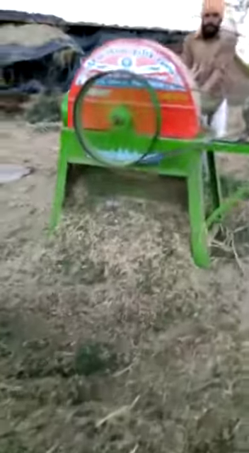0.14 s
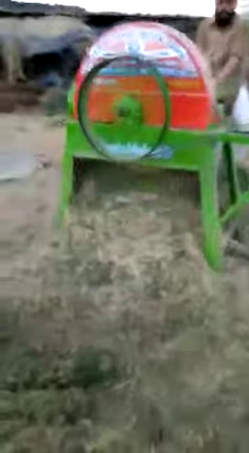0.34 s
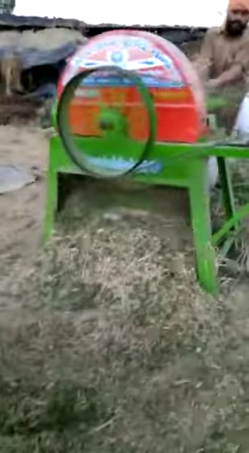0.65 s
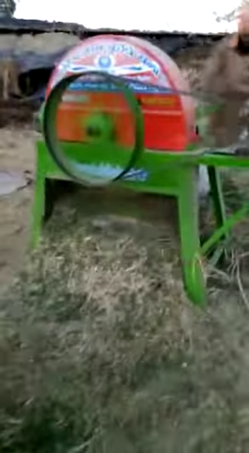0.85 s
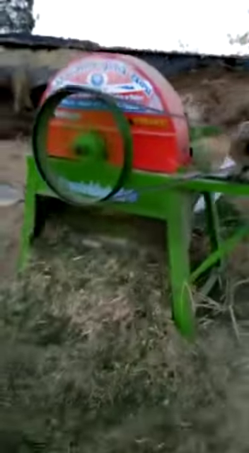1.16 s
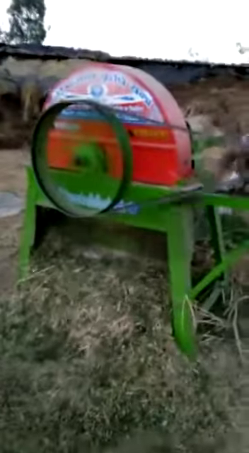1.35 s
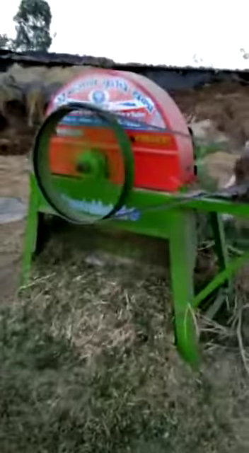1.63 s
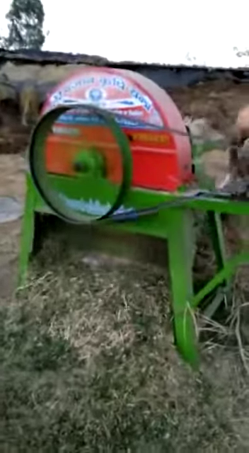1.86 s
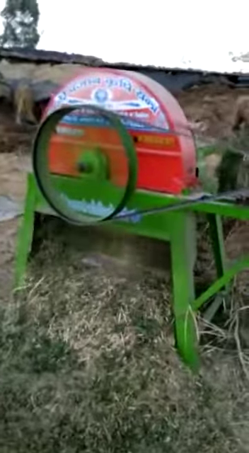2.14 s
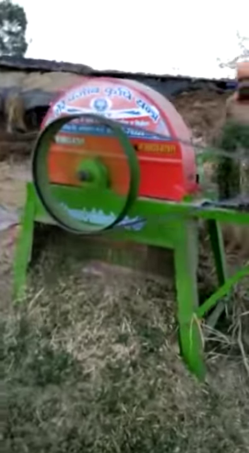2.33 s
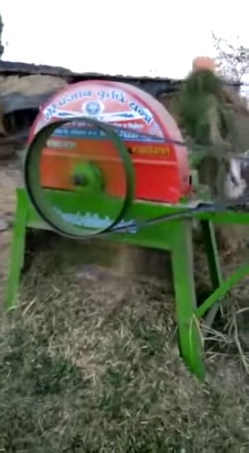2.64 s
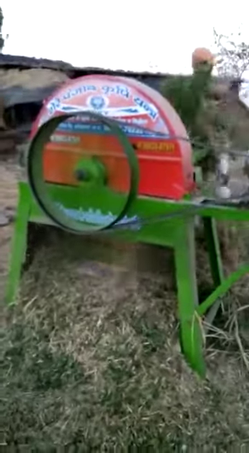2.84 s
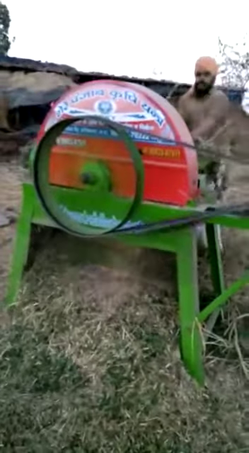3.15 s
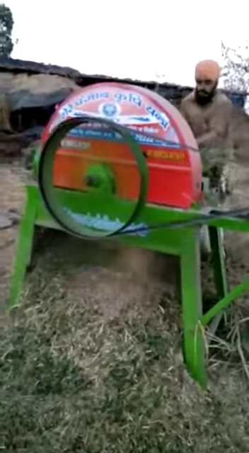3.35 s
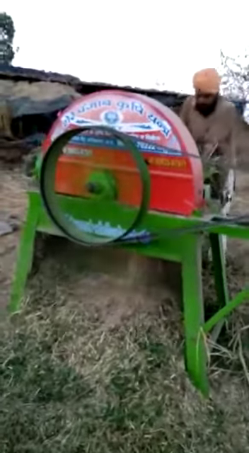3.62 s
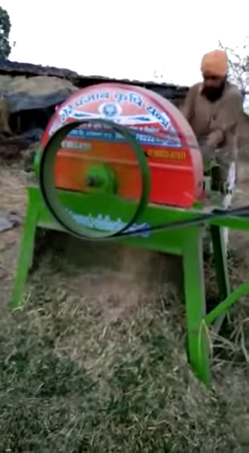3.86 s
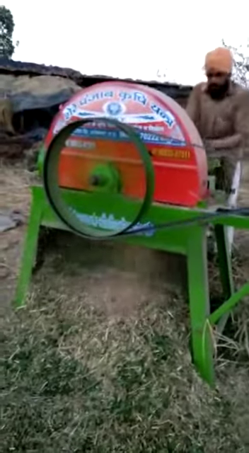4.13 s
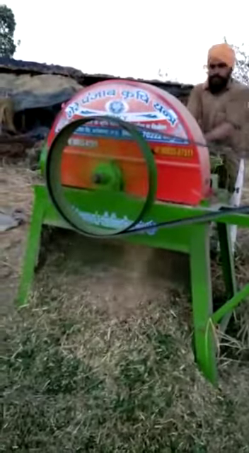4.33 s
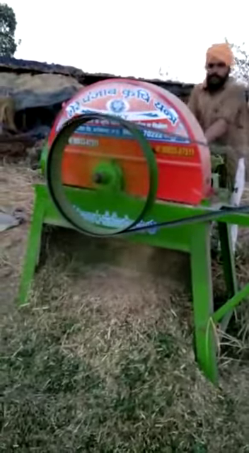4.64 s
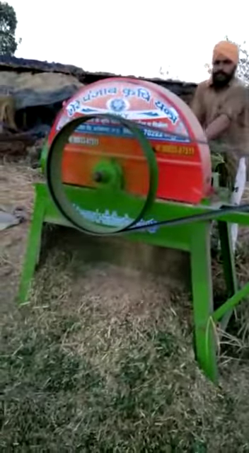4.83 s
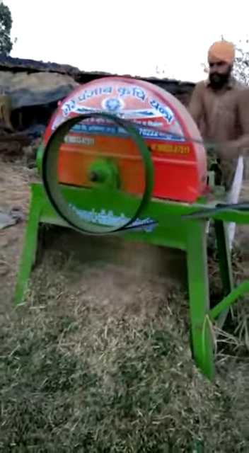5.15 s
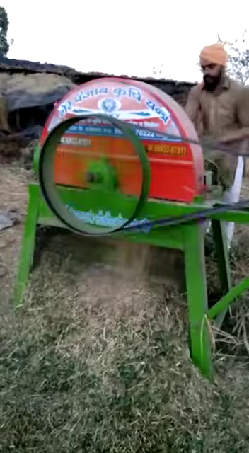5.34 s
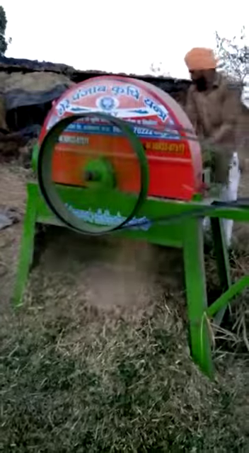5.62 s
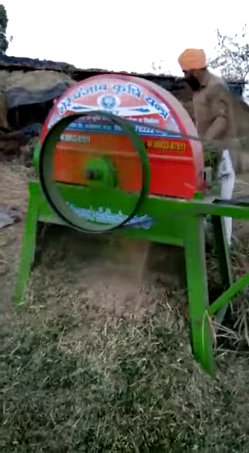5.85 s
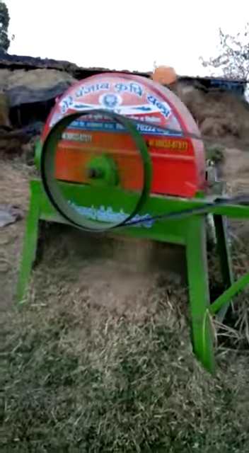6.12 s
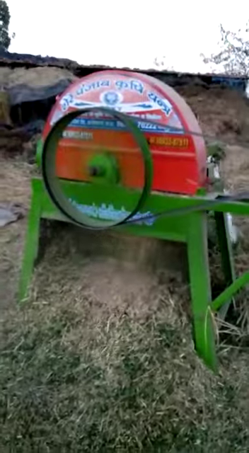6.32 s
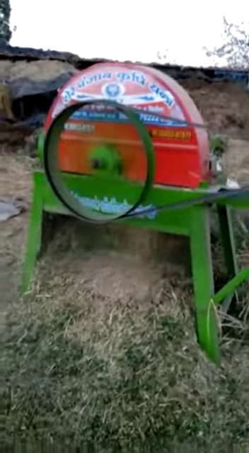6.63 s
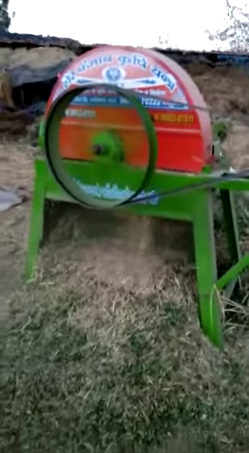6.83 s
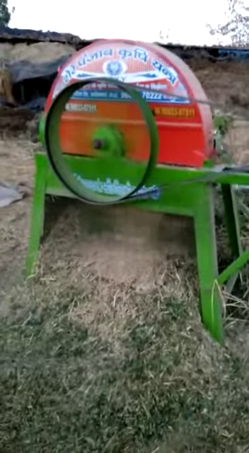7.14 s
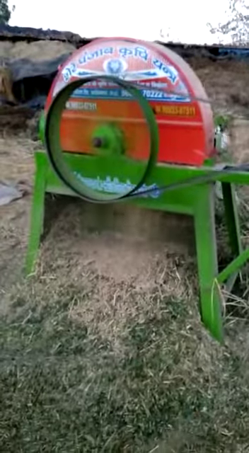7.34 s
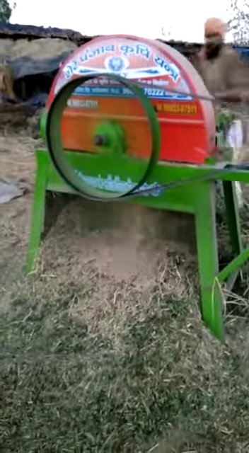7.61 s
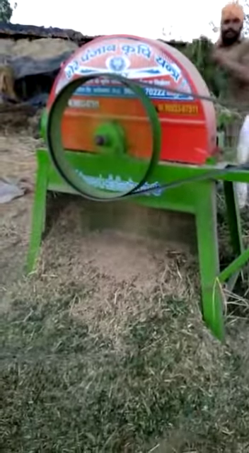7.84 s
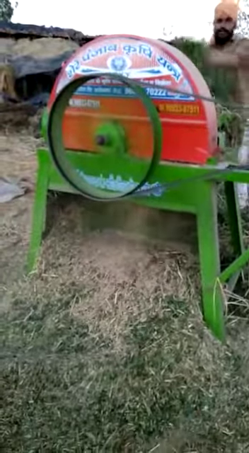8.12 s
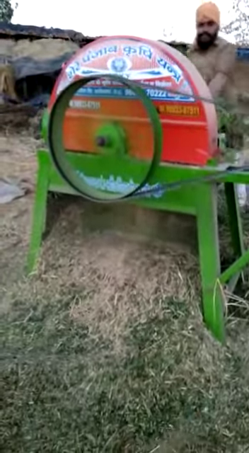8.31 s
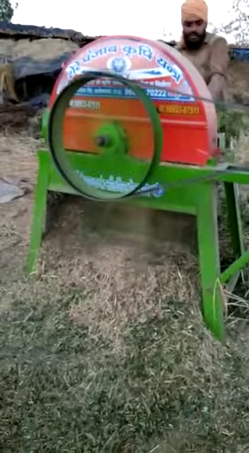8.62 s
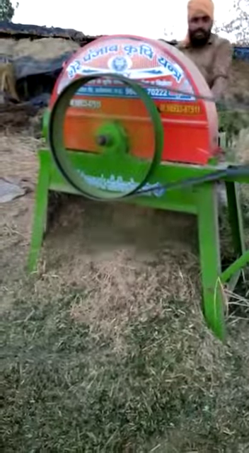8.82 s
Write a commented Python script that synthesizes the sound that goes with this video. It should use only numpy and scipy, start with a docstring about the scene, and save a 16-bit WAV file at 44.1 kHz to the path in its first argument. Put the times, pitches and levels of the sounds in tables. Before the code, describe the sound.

A belt-driven fodder chopper runs without a break for about nine seconds in an open yard, a few metres from the microphone. Its blades shear stalks about seven times a second, each pass a bright, crackling swish over a fizz of chaff. The belt's riveted joint strikes two pulleys in sharp, uneven pairs of clacks, between four and five clacks a second, the loudest sounds. Very short, high belt squeals slip in between, and stray stalks snap at irregular moments. Gears and loose steel panels rattle and buzz, strongest in the first 2.5 seconds and again around 8.5 seconds. A loose plate chinks quickly, fading from about 3 to 6 seconds and then returning. A breeze buffets the microphone in low puffs, most noticeably in the first 1.5 seconds and more lightly afterwards, over a faint, dull outdoor rumble.

```python
"""A hissing steel rattle runs throughout: gears shake a belt-driven fodder cutter in an open yard. A blade
snaps as it bites in, each blade pass shears the feed with a crackling swish, and a loose plate chinks. A breeze
buffets the small microphone. The belt's riveted joint clacks over two pulleys, and the belt squeals in short
slips."""
import sys
import numpy as np
from scipy import signal
from scipy.fft import rfft, irfft, next_fast_len
from scipy.io import wavfile
from scipy.ndimage import uniform_filter1d

SR = 44100
rng = np.random.default_rng(int(sys.argv[2]) if len(sys.argv) > 2 else 0)


def generate_wav(signal):
    """Clip the signal to [-1, 1] and save it as 16-bit WAV at the path in sys.argv[1]."""
    frames = np.transpose(np.atleast_2d(signal))
    scaled = np.clip(frames, -1, 1) * 32767
    pcm = np.round(scaled).astype(np.int16)
    wavfile.write(sys.argv[1], SR, pcm)


N = 395577


def gain_of(db):
    """Turns decibels into a number to multiply by."""
    return 10 ** (np.asarray(db) / 20)


def evened(x):
    """Scales a sound to an average strength (rms) of 1."""
    return x / np.sqrt(np.mean(x ** 2) + 1e-20)


def coloured(x, points):
    """Shapes the tone of x along (Hz, dB) points; strength 1."""
    point_hz, db = np.transpose(points)
    size = next_fast_len(N)
    hz = np.fft.rfftfreq(size, 1 / SR)
    gain = gain_of(np.interp(np.log(hz + 1), np.log(point_hz + 1), db))
    return evened(irfft(rfft(x, size) * gain, size)[:N])


def ring(x, hz, *widths):
    """Rings x at one pitch, once for each width in Hz; narrower rings longer."""
    for width in widths:
        x = signal.lfilter(*signal.iirpeak(hz, hz / width, SR), x)
    return x


def glide(x, hz, width):
    """Rings x at a moving pitch; strength 1."""
    turn = np.exp(2j * np.pi * np.cumsum(hz) / SR)
    fade = [1, -np.exp(-np.pi * width / SR)]
    return evened((turn * signal.lfilter([1], np.convolve(fade, fade), x / turn)).real)


def drift(per_s):
    """A random curve, about 1 in size, that turns per_s times a second."""
    steps = np.clip(rng.standard_normal(int(N / SR * per_s) + 2), -1.7, 1.7)
    return np.interp(np.arange(N) / SR * per_s, np.arange(len(steps)), steps)


def crackle(per_s, spread_db):
    """Scattered clicks, a few of them larger; strength 1."""
    size = gain_of(spread_db * np.minimum(rng.exponential(1, N), 3))
    return evened(size * rng.choice([-1., 1.], N) * (rng.random(N) < per_s / SR))


def patchy(x, depth_db, frames, bins):
    """Random patches in time and pitch give the noise a watery, warbling texture."""
    hz, _, spectrum = signal.stft(x, SR, nperseg=256, noverlap=192)
    depth_db = depth_db / (1 + (hz[:, None] / 10000) ** 4)  # the top octave stays smooth
    blobs = uniform_filter1d(rng.standard_normal(spectrum.shape), frames, 1)
    blobs = evened(uniform_filter1d(blobs, bins, 0))
    return evened(signal.istft(spectrum * gain_of(depth_db * blobs), nperseg=256, noverlap=192)[1][:N])


def add(mix, s, sound):
    """Mixes a sound in at s seconds."""
    at = round(s * SR)
    part = mix[max(at, 0):][:len(sound) + min(at, 0)]
    part += sound[max(-at, 0):][:len(part)]


def bouts(rows, rest_db, rest_hz=0, edge_s=0.038):
    """A level that swells from rest for each row, and the pitch held meanwhile."""
    level, hz = np.full(N, gain_of(rest_db)), np.full(N, float(rest_hz))
    for s, length, db, *pitch in rows:
        size = round((length + edge_s) * SR)
        swell = signal.windows.tukey(size, min(2 * edge_s * SR / size, 1))
        add(level, s - edge_s / 2, gain_of(db) * swell)
        add(hz, s - edge_s / 2, np.full(size, pitch[0] - rest_hz if pitch else 0.))
    return level, hz


# The two-bladed flywheel. Each value: time in seconds of every sixth blade pass.
FLYWHEEL_S = [.047, .86, 1.672, 2.487, 3.314, 4.142, 4.968, 5.795, 6.613, 7.433, 8.251, 9.067]


def pass_time(number):
    """When a given blade pass comes, in seconds."""
    return np.interp(number, 6 * np.arange(len(FLYWHEEL_S)), FLYWHEEL_S)


def passes_done():
    """The running count of blade passes."""
    return np.interp(np.arange(N) / SR, FLYWHEEL_S, 6 * np.arange(len(FLYWHEEL_S)), left=0)


# The tone of the hiss. Each row: pitch in Hz, level in dB.
HISS_TONE = [(1760, -51), (3000, -28), (3520, -54), (3830, -23), (3970, -34), (4230, -6.5), (5750, -5),
             (6950, 6), (8950, -3.5), (11500, -46), (12800, -8), (14800, -3), (16000, -4)]


def chaff_hiss():
    """Chaff and small parts fizz all the time, heard between the cuts."""
    hiss = coloured(0.2 * crackle(1500, 6.6) + rng.standard_normal(N), HISS_TONE)
    return patchy(hiss, 8.9, frames=19, bins=3) * gain_of(-35 + 8.2 * drift(40))


# The tone of the yard. Each row: pitch in Hz, level in dB.
YARD_TONE = [(200, 14), (600, 5), (1200, 16), (2500, -60), (3400, -42), (5000, -4)]


def yard_rumble():
    """The yard's dull, uneven background noise."""
    return gain_of(-57) * patchy(coloured(rng.standard_normal(N), YARD_TONE), 4.3, frames=38, bins=1)


# How hard the frame shakes. Each row: time in seconds, then gear, upper ring and side panel levels in dB.
FRAME_SHAKE = [(0.0, -41, -41, -36), (0.27, -32, -33, -34.5), (1.37, -39.5, -26.5, -34),
               (1.42, -30.5, -28, -32), (2.12, -35.5, -30, -42), (2.27, -51, -34, -42),
               (2.37, -32.5, -32.5, -43.5), (3.32, -47.5, -42.5, -38.5), (3.49, -35.5, -40, -42),
               (3.65, -52, -48, -54), (3.72, -35, -40, -40), (3.8, -42, -45, -49), (3.9, -35.5, -51, -40),
               (4.45, -50, -49, -51.5), (4.5, -38.5, -45, -62), (4.57, -45, -45, -40.5),
               (5.02, -45, -47, -45.5), (5.15, -38, -33, -46), (5.27, -43, -48, -41.5),
               (5.45, -39.5, -38, -51), (5.82, -36.5, -48, -43), (5.87, -55, -44, -62),
               (5.97, -35.5, -41.5, -38.5), (6.87, -43.5, -40.5, -47.5), (7.62, -44.5, -42.5, -43),
               (8.47, -37, -39, -39.5), (8.57, -44.5, -33.5, -51), (8.69, -30, -36, -31.5),
               (8.92, -47.5, -41, -51), (8.97, -54, -41, -47)]
# Loose hood and legs buzz. Each row: start and length in seconds, level in dB, pitch in Hz.
HOOD_BUZZES = [(0.165, 0.11, -39, 920), (0.304, 0.023, -41, 924), (0.882, 0.19, -36, 909),
               (1.244, 0.13, -38.5, 1032), (1.465, 0.088, -42, 980), (1.576, 0.3, -35, 938),
               (1.96, 0.12, -35.5, 924), (2.154, 0.075, -40, 910), (2.897, 0.048, -40, 902),
               (3.985, 0.035, -38, 975), (5.373, 0.03, -45, 906), (5.63, 0.043, -38.5, 895),
               (6.123, 0.055, -43.5, 940), (7.384, 0.17, -40.5, 904), (7.99, 0.09, -41.5, 904),
               (8.208, 0.064, -40.5, 925), (8.323, 0.15, -39.5, 930), (8.674, 0.036, -40.5, 907),
               (8.928, 0.033, -38, 900)]
LEG_BUZZES = [(0.031, 0.056, -37.5, 490), (0.32, 0.19, -37.5, 507), (0.592, 0.43, -40.5, 500),
              (1.246, 0.12, -42, 444), (1.4, 0.11, -35.5, 460), (1.677, 0.083, -39.5, 490),
              (2.08, 0.062, -47, 403), (2.567, 0.077, -42, 480), (2.805, 0.072, -45, 397),
              (3.315, 0.043, -38, 417), (4.559, 0.048, -43.5, 386), (5.798, 0.047, -42.5, 370),
              (5.898, 0.066, -50, 433), (7.698, 0.046, -36, 475), (8.033, 0.03, -45, 474),
              (8.4, 0.12, -44, 410), (8.717, 0.088, -39.5, 479), (8.921, 0.024, -44, 481)]
# The chute buzzes. Each row: start and length in seconds, level in dB.
CHUTE_BUZZES = [(0.009, 0.075, -41), (0.189, 0.065, -45), (0.278, 0.23, -40.5), (0.551, 0.032, -43),
                (1.28, 0.034, -41), (1.635, 0.032, -51), (2.76, 0.03, -47)]
# The side panel, then the chute. Each row: pitch and width in Hz.
PANEL_RINGS = [(1879, 173), (673, 110)]
# Weaker frame rings. Each row: pitch and width in Hz, dB relative to the upper ring.
WEAK_RINGS = [(1630, 82, -9.5), (2470, 120, -15), (1166, 320, -22), (374, 52, -24)]
# Each value: width in Hz of the gear, hood, upper and leg ring.
MOVING_WIDTHS_HZ = [91, 68, 97, 125]
TEETH_PER_S, GEAR_HZ, UPPER_HZ = 48.9, 1449.3, 2163


def frame_rattle():
    """Gear teeth knock and grind, ringing sheet steel whose pitches shift as it flexes."""
    times, *columns = np.transpose(FRAME_SHAKE)
    gear_db, upper_db, panel_db = [np.interp(np.arange(N) / SR, times, db) for db in columns]
    tooth_rate = TEETH_PER_S * (1 + 0.0312 * drift(4.3))
    teeth = gain_of(2.1 * np.cos(2 * np.pi * np.cumsum(tooth_rate) / SR))
    jolt = np.cos(2 * np.pi * (passes_done() - .05))  # every blade pass jolts the steel
    heave = np.cos(np.pi * (passes_done() - 1.15))  # the flywheel loads the gears once a turn
    knocks = teeth * (.5 * crackle(500, 1.0) + rng.standard_normal(N))
    moving = [(gain_of(gear_db + 2.06 * heave + 4.0 * drift(9)), GEAR_HZ + 35 * drift(7)),
              bouts(HOOD_BUZZES, rest_db=-52.5, rest_hz=926),
              (gain_of(upper_db + 0.66 * jolt + 1.65 * drift(7.2)), UPPER_HZ + 42 * drift(8)),
              bouts(LEG_BUZZES, rest_db=-53, rest_hz=450.5)]
    out = np.zeros(N)
    for (level, hz), width in zip(moving, MOVING_WIDTHS_HZ):
        out += level * gain_of(2.97 * drift(40)) * glide(knocks, hz, width)
    panel_levels = [gain_of(panel_db + 3.5 * jolt), bouts(CHUTE_BUZZES, rest_db=-65)[0]]
    for level, (hz, width) in zip(panel_levels, PANEL_RINGS):
        out += level * gain_of(4.5 * drift(25)) * evened(ring(knocks, hz, width, width))
    for hz, width, db in WEAK_RINGS:
        level = gain_of(upper_db + db + 1.9 * jolt + 5.1 * drift(14))
        out += level * evened(ring(knocks, hz, width, width))
    return out


# Snaps as a blade bites into the feed, just before its pass. Each row: start in seconds, peak in dB, pitch in
# Hz.
STALK_SNAPS = [(0.027, -28, 7720), (0.2294, -20, 6100), (0.55, -12, 6300), (0.664, -13, 8000),
               (0.8262, -22.5, 7940), (1.0899, -15, 7900), (1.4945, -19, 7100), (1.9865, -11, 6960),
               (2.1856, -27, 7030), (2.7307, -13, 7500), (2.837, -12.5, 6960), (3.548, -13, 7000),
               (3.6671, -24, 7180), (3.8349, -24, 7120), (4.2637, -12.5, 7030), (4.339, -16, 6850),
               (4.388, -20, 7000), (4.4882, -20, 6940), (4.81, -26, 7070), (5.229, -9, 6340),
               (5.4266, -17, 7300), (5.906, -16, 7260), (6.0334, -32, 7000), (6.1787, -23, 5950),
               (6.319, -8.5, 7060), (6.862, -10, 7040), (6.9975, -17, 6450), (7.2197, -22, 6800),
               (7.543, -12, 6500), (7.6806, -17, 7080), (7.7812, -22, 7110), (8.0526, -30, 7070),
               (8.087, -14, 6470), (8.229, -15, 7170), (8.5989, -15, 7100)]


def stalk_snaps():
    """A stalk breaks with a sharp burst of noise that rings briefly."""
    out, t = np.zeros(N), np.arange(1300) / SR
    for s, db, hz in STALK_SNAPS:
        burst = rng.standard_normal(len(t)) * np.exp(-t / 0.012) * (1 - np.exp(-t / 0.00037))
        splash = ring(ring(burst, 7100, 3400, 3400), 6900, 4500)
        snap = ring(burst, hz, 900, 900) + .5 * splash
        add(out, s, gain_of(db) * snap / abs(snap).max())
    return out


# The tone of the swish. Each row: pitch in Hz, level in dB.
SWISH_TONE = [(2600, -27.5), (3400, -43), (3800, -7.5), (5500, -2), (7240, 0), (8200, -0.5), (9500, -7.5),
              (10700, -11.5), (12500, -10.5), (15300, -2)]
# The two blades. Each row: level of the swish's body in dB, treble lift in dB.
BLADE_LEVELS = [(-22, -.5), (-20, 1)]
# The swish's treble. Each row: time in seconds, level in dB.
SWISH_TREBLE = [(0, -24), (.5, -24.5), (1.3, -26), (2.3, -23.5), (3.5, -26.5), (4.9, -27.5), (6.75, -28),
                (8, -31), (8.97, -27.5)]
# Thick stalks crunch. Each value: level in dB for one blade pass.
PASS_CRUNCH_DB = [-49, -33, -39, -31, -30, -28, -32, -27, -33, -28.5, -30, -28, -39, -33.5, -30.5, -35.5,
                  -40, -42, -40, -36, -37, -32.5, -47, -36, -42, -34, -48, -36, -49, -35, -40, -39.5, -45,
                  -39, -40, -32, -38, -31, -38, -36.5, -40, -38, -46, -39, -42, -34, -32, -35, -41, -47,
                  -37, -40, -41, -36, -31, -33, -49, -32, -33, -34.5, -36, -26.5, -37, -36, -44, -34]
CRUNCH_HZ, CRUNCH_SPREAD_HZ, STALKS_PER_PASS = 2754, 247, 5


def blade_cuts():
    """Stalks crack and hiss as a blade sweeps the mouth; thrown chaff trails after."""
    t = np.arange(-.05, .12, 1 / SR)
    rise = 1 / (1 + np.exp(-(t + 0.02) / 0.0047))
    sweep = rise / (1 + np.exp((t - .018) / 0.0049))
    trail = gain_of(-4) * rise * (1 - sweep) * gain_of(-170 * t)
    shape = sweep + trail
    body, treble, crunch = np.zeros((3, N))
    for k, crunch_db in enumerate(PASS_CRUNCH_DB):
        harder, brighter = rng.standard_normal(2)
        s, (db, lift_db) = pass_time(k), BLADE_LEVELS[k % 2]
        treble_db = np.interp(s, *np.transpose(SWISH_TREBLE))
        add(body, s + t[0], gain_of(db + 1.2 * harder) * shape)
        add(treble, s + t[0], gain_of(treble_db + lift_db + 1.5 * brighter) * shape ** 0.82)
        add(crunch, s + t[0] + 0.0083, gain_of(crunch_db) * shape ** 1.4)
    shear = coloured(0.46 * crackle(3000, 1.1) + 0.85 * rng.standard_normal(N), SWISH_TONE)
    shear = patchy(shear, 2.9, frames=9, bins=2) * gain_of(1.7 * drift(150))
    low = signal.sosfiltfilt(signal.butter(4, 9000, fs=SR, output="sos"), shear)
    # thick stalks crack lower and ring the cutter plate, each at a new pitch
    stalk_number = (STALKS_PER_PASS * passes_done()).astype(int)
    pitch = CRUNCH_HZ + CRUNCH_SPREAD_HZ * rng.standard_normal(N)[stalk_number]
    cracks = crackle(900, 4.3) + .5 * rng.standard_normal(N)
    crunch *= evened(glide(cracks, pitch, 170) + 0.86 * glide(cracks, np.full(N, 2800.), 1300))
    return body * evened(low) + treble * evened(shear - low) + crunch


# The plate chinks four times a blade pass. Each row: time in seconds, usual peak in dB.
CHINK_LEVELS = [(0, -19.5), (1, -20), (1.6, -19.5), (2.6, -22.5), (3.3, -29), (4.5, -36), (5.7, -33),
                (6.6, -26.5), (7.5, -28), (8.97, -23.5)]
# The loudest chinks. Each row: start in seconds, peak in dB, pitch in Hz.
LOUD_CHINKS = [(0.3916, -16, 3800), (.42, -16, 3780), (0.827, -19, 4080), (1.414, -13.5, 3920),
               (1.5692, -16, 3800), (3.1777, -19, 4300), (3.5955, -12, 3950), (4.1076, -21, 3860),
               (5.2087, -19, 3880), (5.7932, -18.5, 3940), (6.5819, -19.5, 3840), (6.668, -17.5, 4120),
               (7.68, -17, 3860), (8.2953, -20.5, 4010), (8.4996, -20, 3840), (8.597, -20, 4310)]
CHINK_HZ, CHINK_SPREAD_HZ, CHINK_SPREAD_DB = 4043, 150, 2
JOINT_CHINK_DB, JOINT_CHINK_HZ = -26.5, 4270  # set off by the belt joint on the far pulley


def loose_plate():
    """Thin, shaken steel gives soft-edged pings over faint chatter."""
    tooth_rate = TEETH_PER_S * (1 + 0.056 * drift(7.4))
    ticks = np.cos(2 * np.pi * np.cumsum(tooth_rate) / SR)  # one tick a gear tooth
    chatter = crackle(1200, 2) * gain_of(7 * ticks + 3 * drift(30))
    out = gain_of(-41) * glide(chatter, 4000 + 130 * drift(30), width=124)
    t = np.arange(1800) / SR
    beats = pass_time(np.arange(0, 66, .25))
    louder, higher = rng.standard_normal((len(beats), 2)).T
    peak_db = np.interp(beats, *np.transpose(CHINK_LEVELS)) + CHINK_SPREAD_DB * louder
    regular = list(zip(beats - .003, peak_db, CHINK_HZ + CHINK_SPREAD_HZ * higher))
    from_joint = [(s, JOINT_CHINK_DB, JOINT_CHINK_HZ) for s, _ in JOINT_CLACKS[::2]]
    for s, db, hz in regular + from_joint + LOUD_CHINKS:
        burst = rng.standard_normal(len(t)) * np.exp(-t / 0.01) * (1 - np.exp(-t / 0.0016))
        ping = ring(burst, hz, 450, 640, 720)
        add(out, s, gain_of(db) * ping / abs(ping).max())
    return out


# Puffs of breeze. Each row: start and length in seconds, level in dB.
PUFFS = [(.06, 0.132, -25.5), (.21, 0.081, -22.5), (.33, 0.18, -27), (.52, 0.073, -38), (.66, 0.19, -31),
         (.9, 0.052, -30), (1.02, 0.072, -29.5), (1.14, 0.093, -25.5), (1.29, .08, -32), (1.48, .05, -47),
         (1.62, 0.093, -39), (1.83, 0.043, -38), (1.95, 0.047, -45), (2.21, 0.052, -40),
         (2.39, 0.074, -41.5), (2.65, 0.065, -45), (2.78, 0.058, -34.5), (2.89, 0.064, -35.5),
         (3.34, 0.077, -37), (3.66, 0.056, -37), (3.89, .04, -44), (4.05, 0.052, -43), (4.31, .03, -47),
         (4.44, 0.15, -50), (4.7, .05, -48), (5, 0.13, -35), (5.27, .06, -38), (5.41, 0.032, -50),
         (5.55, 0.18, -49), (5.82, 0.07, -45), (6.09, 0.029, -42), (6.21, .04, -55), (6.37, .11, -46),
         (6.7, .05, -48), (6.8, 0.046, -47), (7.18, 0.059, -45), (7.6, .08, -33.5), (7.73, .04, -33),
         (7.8, 0.045, -34), (8.06, 0.026, -47), (8.43, .1, -43.5), (8.87, .12, -37)]
# The tone of the breeze. Each row: pitch in Hz, level in dB.
BREEZE_TONE = [(15, -58), (25, -27), (70, -11), (100, 0.5), (130, 0.5), (157, -4.5), (190, -1.5),
               (217, -4.5), (296, -23.5), (330, -43), (430, -56), (730, -120)]


def breeze():
    """Air buffets the microphone in low, booming lumps."""
    noise = rng.standard_normal(N)
    lumps = coloured(noise, BREEZE_TONE) + 0.81 * glide(noise, 160 + 12 * drift(12), width=31.4)
    level, _ = bouts(PUFFS, rest_db=-53.5, edge_s=0.057)
    return evened(lumps * gain_of(2.8 * drift(24))) * level


# The joint hits the far and near pulley in turn. Each row: time in seconds, peak in dB.
JOINT_CLACKS = [(0.0937, -3), (0.2718, -3), (0.5182, -3), (0.7023, -4), (0.9472, -5), (1.1328, -5),
                (1.3793, -5), (1.5653, -3), (1.8124, -5), (1.9984, -6), (2.2473, -3), (2.4349, -7),
                (2.6863, -4), (2.8719, -5), (3.1233, -4), (3.3094, -7), (3.5624, -4), (3.7474, -8),
                (4.0024, -4), (4.1904, -5), (4.4424, -3), (4.6314, -5), (4.8828, -4), (5.0684, -9),
                (5.3218, -4), (5.5074, -6), (5.7603, -5), (5.9464, -7), (6.1958, -5), (6.3824, -5),
                (6.6338, -3), (6.8209, -4), (7.0728, -3), (7.2574, -10), (7.5153, -4), (7.6969, -4),
                (7.9473, -4), (8.1339, -4), (8.3828, -5), (8.5709, -7), (8.8204, -3)]
# Rivet blows, far pulley then near. Each row: delay in seconds, level in dB, share (0-1) for the rim.
RIVET_BLOWS = [
    [(0, 2.5, 0.4), (.0011, -4, 0.4), (.0021, 2, 0.4), (.0034, -11, 0.5), (.005, 0.5, 0), (.0068, 1.5, 0),
     (.0082, 1, 0.1), (.012, -3, 0.1)],
    [(0, 0, 0.6), (.0008, -4.5, .7), (.0016, 2, .4), (.0026, 1.5, .4), (.0045, 5.5, .7), (.0075, -6, 0.7),
     (.012, -16, .5)],
]
# How the far and near pulley ring, rim first. Each row: pitch and width in Hz, level in dB.
PULLEY_RINGS = [
    [(7380, 180, 12), (4500, 850, 4.5), (6250, 1370, -0.5), (7170, 1320, 1), (3130, 2500, -17)],
    [(7160, 470, 11), (4340, 900, -5.5), (5820, 1050, -5.5), (8540, 670, 3), (9270, 1500, -5),
     (12900, 7000, -18)],
]


def belt_joint():
    """Rivets strike in a quick row, ringing the pulley's body and setting its rim singing."""
    out = np.zeros(N)
    for k, (s, db) in enumerate(JOINT_CLACKS):
        (rim_hz, rim_width, rim_db), *body = PULLEY_RINGS[k % 2]
        body_blows, rim_blows = np.zeros((2, 1200))
        for delay, rivet_db, share in RIVET_BLOWS[k % 2]:
            late, harder = rng.standard_normal(2)
            blow = gain_of([rivet_db + 1.6 * harder])
            add(body_blows, abs(delay + 0.00025 * late), (1 - 0.25 * share) * blow)
            rim_cycles = round(rim_hz * abs(delay + 0.0002 * late))  # in step with the ring
            add(rim_blows, rim_cycles / rim_hz, share * blow)
        clack = gain_of(rim_db) * ring(rim_blows, rim_hz, rim_width, 2 * rim_width)
        for j, (hz, width, ring_db) in enumerate(body):
            clack += (-1) ** j * gain_of(ring_db) * ring(body_blows, hz, width, 2 * width)
        add(out, s - .0008, gain_of(db) * clack / abs(clack).max())
    return out


# Two small slips a belt lap. Each row: pulley (0 far, 1 near), seconds before its clack,
# length in seconds, level in dB.
SMALL_SLIPS = [(0, 0.157, 0.023, -30), (1.004, .03, 0.022, -30)]
# A slip just before the far clack, from the third lap on. Each value: one lap's level in dB.
MAIN_SLIP_DB = [-22.5, -32, -31, -22.5, -24, -24.5, -26, -23, -22, -26, -22, -26, -24.5, -29, -27, -22.5,
                -31, -22.5, -28]
# Slips out of step with the joint. Each row: start and length in seconds, level in dB.
STRAY_SLIPS = [(1.177, 0.014, -26.5), (1.495, .015, -29), (2.536, 0.054, -27), (3.341, 0.021, -38),
               (3.666, 0.029, -25), (3.784, 0.02, -27), (3.873, 0.025, -25), (4.113, .013, -26),
               (4.18, 0.06, -27), (4.75, 0.04, -26), (5.014, 0.029, -25.5), (5.426, 0.025, -25),
               (5.543, 0.023, -25), (5.98, 0.019, -31), (6.06, .014, -35), (7.198, 0.035, -30),
               (7.616, 0.016, -24), (7.725, 0.028, -22.5), (8.054, 0.017, -28), (8.487, .012, -27),
               (8.516, .014, -23), (8.603, .034, -28), (8.802, 0.0091, -21)]
SQUEAL_HZ, SMALL_FROM_S, MAIN_LEAD_S, MAIN_LENGTH_S = 7030, .8, 0.065, 0.049


def belt_squeal():
    """The belt grips and slips: wavering whistles over a faint, constant whine."""
    slips = [(s - lead, length, db) for pulley, lead, length, db in SMALL_SLIPS
             for s, _ in JOINT_CLACKS[int(pulley)::2] if s > SMALL_FROM_S]
    slips += [(s - MAIN_LEAD_S, MAIN_LENGTH_S, db)
              for (s, _), db in zip(JOINT_CLACKS[4::2], MAIN_SLIP_DB)]
    level = gain_of(-44.5 + 8.5 * drift(28))
    hz = SQUEAL_HZ + 50 * drift(25)
    for s, length, db in slips:
        late, longer, louder = rng.standard_normal(3)
        swell = signal.windows.tukey(round(length * np.exp(.2 * longer) * SR), .4)
        add(level, s + 0.0051 * late, gain_of(db + 1.4 * louder) * swell)
    for s, length, db in STRAY_SLIPS:
        add(level, s - .003, gain_of(db) * signal.windows.tukey(round((length + 0.003) * SR), .4))
    tone = np.sin(2 * np.pi * np.cumsum(hz + 22 * drift(250) + 14 * drift(45)) / SR)
    scrape = glide(rng.standard_normal(N), hz + 250 * drift(35), width=220)
    whistle = np.sqrt(2) * tone * gain_of(3.4 * drift(220))
    return level * (whistle + 0.12 * scrape) + gain_of(-44.5 + 9.6 * drift(30)) * scrape


def scene():
    """All the sounds in one channel, a few metres away in the open."""
    machine = blade_cuts() + stalk_snaps() + belt_joint() + belt_squeal() + frame_rattle() + loose_plate()
    return (machine + breeze() + chaff_hiss() + yard_rumble())[None]


def record(dry):
    """The microphone's small opening dips the low treble; the highest treble is cut off."""
    dipped = dry - 0.45 * ring(dry, 3427, 600)
    treble_cut = signal.firwin(1023, cutoff=15520, window=("kaiser", 9), fs=SR)
    return signal.oaconvolve(dipped, treble_cut[None], "same")


dry = scene()
out = record(dry)
generate_wav(out)
```